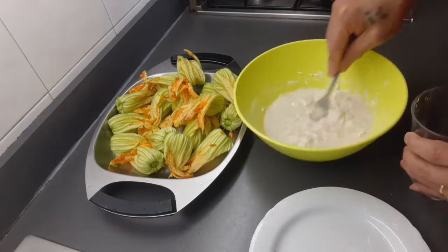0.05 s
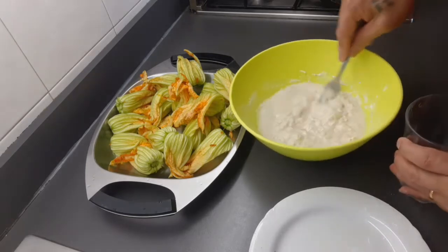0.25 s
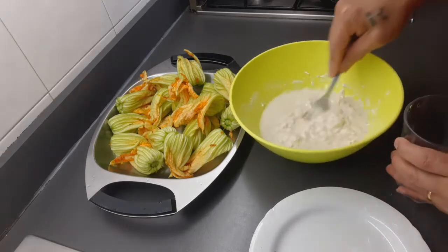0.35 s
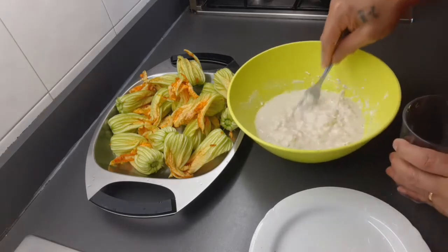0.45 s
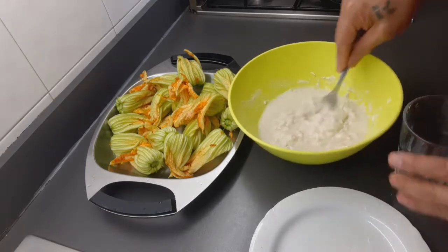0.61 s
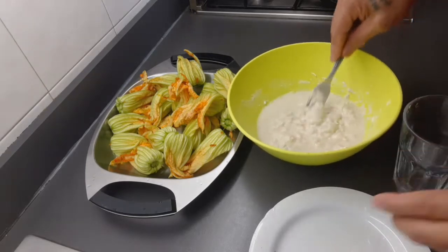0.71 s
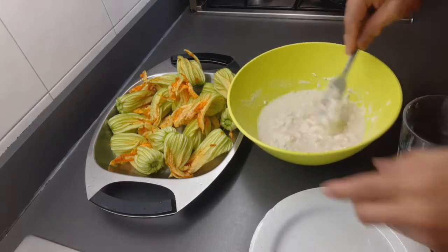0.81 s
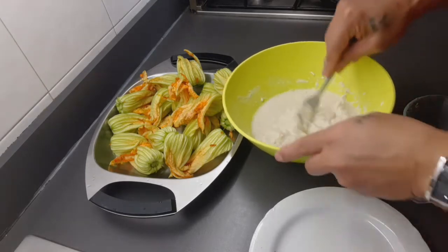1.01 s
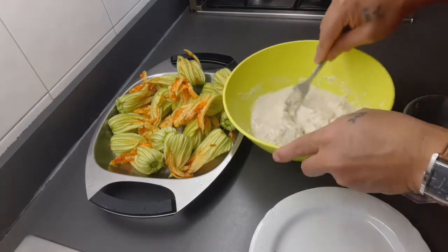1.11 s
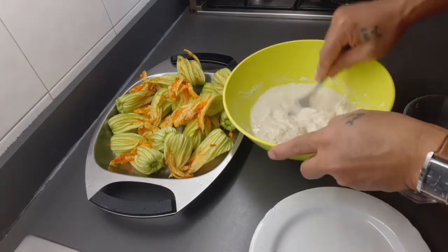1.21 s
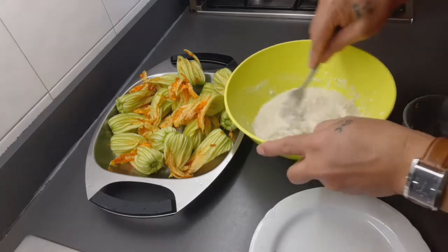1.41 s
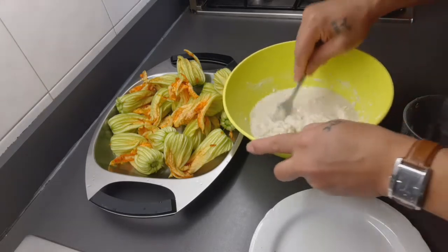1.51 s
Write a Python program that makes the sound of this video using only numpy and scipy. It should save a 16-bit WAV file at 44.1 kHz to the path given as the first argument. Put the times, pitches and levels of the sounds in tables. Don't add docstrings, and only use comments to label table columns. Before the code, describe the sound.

A glass is set down on a kitchen counter with a hard knock and brief rattle beside batter stirring

```python
import sys
import numpy as np
from scipy import signal
from scipy.fft import rfft, irfft
from scipy.io import wavfile
from scipy.ndimage import uniform_filter1d

SR = 44100
rng = np.random.default_rng(int(sys.argv[2]) if len(sys.argv) > 2 else 0)


def transcribe(signal):
    frames = np.atleast_2d(signal).T
    limited = np.clip(frames, -1, 1)
    pcm = np.round(limited * 32767).astype(np.int16)
    wavfile.write(sys.argv[1], SR, pcm)


def voltage_ratio(level):
    return 10 ** (np.asarray(level, float) / 20)


N = 68355

# t/s, level/dB
STIR_EFFORT = [(0, -59.5), (.12, -55), (.23, -61), (.4, -56), (.47, -57), (.53, -72), (.62, -58.5),
               (.71, -63.5), (.75, -73.5), (.96, -96.5), (1.005, -56), (1.09, -56), (1.17, -69.5),
               (1.26, -57), (1.31, -57), (1.36, -65), (1.49, -64), (1.55, -61.5)]


def curve(table):
    return np.interp(np.arange(N) / SR, *np.array(table).T)


def read(table, hz):
    table = np.array(table, float)
    return np.interp(np.log(np.maximum(hz, 1)), np.log(table[:, 0]), table[:, 1])


def colour(x, db=0, lead=0):
    return irfft(rfft(x) * voltage_ratio(db) * np.exp(1j * lead), N)


def unit(x):
    return x / np.sqrt(np.mean(x ** 2))


def walk(rate):
    hold = int(SR / rate)
    steps = np.repeat(rng.standard_normal(N // hold + 1), hold)
    return 0.79 * uniform_filter1d(uniform_filter1d(steps, hold), hold)[:N]


def ring(x, modes):
    total = 0
    for k, (hz, db, t60) in enumerate(modes):
        pole = np.exp((2j * np.pi * hz - np.log(1000) / max(t60, .003)) / SR)
        total = total + (-1) ** k * voltage_ratio(db) * signal.lfilter([1], [1, -pole], x).imag
    return total


def push(s, ms):
    progress = np.clip((np.arange(N) / SR - s) * 1000 / max(ms, .1), 0, 1)
    force = np.sin(np.pi * progress) ** 2
    return force / force.sum()


def burst(s, t60, hz):
    late = np.arange(N) / SR - s
    lowpass = signal.butter(6, min(hz, 19000), fs=SR, output="sos")
    hiss = signal.sosfilt(lowpass, rng.standard_normal(N))
    hiss = signal.lfilter(*signal.butter(1, [1500, 4000], "band", fs=SR), hiss) + 0.11 * hiss
    return hiss * (late > 0) * voltage_ratio(-60 * np.abs(late) / t60)


def glass():
    # t/s, peak level/dB, contact/ms
    contacts = [(.2398, -14, 0.37), (.2435, -16.5, 0.35), (.2462, -22, 0.74), (.2500, -30, 0.66),
                (.266, -36.5, 1.4), (.292, -25.5, 1.73), (.339, -71, 2.5), (.382, -36, 1.57),
                (.397, -32.5, 1.52), (.428, -42, 3), (.455, -45, 1.34)]
    # f/Hz, level/dB, t60/s
    counter_modes = [(134.6, -2, 0.15), (200, -0.5, 0.19), (255, 6.5, 0.067), (301, 1.5, .13),
                     (341.5, -4.5, .15), (400, 0, 0.11), (505.7, 1, 0.26), (586.7, 3.5, 0.097),
                     (754.6, 5, 0.076), (823, 1.5, 0.08), (1030, 9.5, 0.041), (1122, 8.5, 0.045),
                     (1600, -1.5, 0.053), (2100, -2, .04)]
    # t/s, level/dB
    chatter_level = [
        (.239, -77.5),
        (.243, -26.5),
        (.31, -38.5),
        (.33, -49.5),
        (.37, -46),
        (.397, -53),
        (.43, -64),
        (.48, -59),
        (.52, -77),
    ]
    chatter_hz = 450
    crack_db, crack_t60_s, crack_hz = -23.5, 0.078, 7220

    force = sum(voltage_ratio(db) * (-1) ** k * push(s, ms) for k, (s, db, ms) in enumerate(contacts))
    knock = 0.34 * ring(force, counter_modes)
    uneven = rng.standard_normal(N) * voltage_ratio(3.65 * rng.exponential(1, N))
    shake = signal.lfilter(*signal.butter(1, chatter_hz, fs=SR), uneven)
    chatter = unit(ring(shake, counter_modes)) * voltage_ratio(curve(chatter_level))
    landing_s = contacts[0][0]
    crack = np.array([burst(landing_s, crack_t60_s, crack_hz) for _ in range(2)])
    return knock + chatter, voltage_ratio(crack_db) * crack


def taps():
    # t/s, peak level/dB, wall pitch f/Hz, t60/s
    tick_events = [(0.406, -48, 5250, 0.028), (0.444, -66, 3180, 0.032), (0.46, -47, 3100, 0.016),
                   (0.556, -60.5, 1300, 0.045), (.572, -70, 5600, 0.032), (1.0609, -54.5, 807, 0.071),
                   (1.2152, -47, 3140, 0.017), (1.265, -49, 1140, 0.013), (1.2717, -37, 1367, 0.027),
                   (1.28, -45, 3200, 0.028), (1.266, -56, 5240, .02), (.405, -58, 3770, 0.022),
                   (1.292, -57, 1600, 0.062), (1.303, -48.5, 1630, 0.022), (1.3885, -38, 1350, 0.0085),
                   (1.5065, -50, 820, 0.043), (1.506, -57, 1940, 0.026)]
    # ratio to its pitch, level/dB
    wall_partials = [(1, 6), (.76, -3), (1.35, -4)]
    # t/s, peak level/dB, pitch
    # f/Hz, t60/s
    thud_events = [(.092, -47, 238, 0.092), (0.636, -53, 245, 0.041), (0.674, -44.5, 253, 0.052),
                   (0.242, -26.5, 100, 0.19), (0.388, -45, 100, 0.35), (0.386, -26, 200, 0.069),
                   (.40, -28, 400, 0.048), (0.418, -37, 244, 0.17), (1.061, -35, 255, 0.048),
                   (1.283, -40, 251, 0.053), (1.2154, -37.5, 395.5, 0.068), (1.225, -37.5, 250, 0.058),
                   (1.272, -43.5, 284, 0.073), (1.392, -60, 295, 0.02), (1.51, -35, 251, 0.04),
                   (1.535, -45.5, 200, 0.079)]

    total = 0
    for s, db, hz, t60 in tick_events:
        modes = [(hz * ratio, level, t60) for ratio, level in wall_partials]
        total = total + voltage_ratio(db) * ring(push(s, 0.16), modes)
    for s, db, hz, t60 in thud_events:
        total = total + voltage_ratio(db) * ring(push(s, .9), [(hz, 0, t60), (1.5 * hz, -9, t60)])
    return total


def slaps():
    # t/s, level/dB, top f/Hz, t60/s
    slap_events = [
        (.08, -62, 12340, 0.037),
        (1.0605, -28.5, 16700, 0.038),
        (1.069, -36, 15600, .03),
        (1.2145, -36.5, 6960, 0.021),
        (1.271, -41, 6900, 0.084),
        (1.288, -45, 13000, 0.081),
        (1.3895, -42, 7000, 0.094),
        (1.5065, -36, 8900, 0.07),
    ]
    return np.array([sum(voltage_ratio(db - 1) * burst(s, t60, hz) for s, db, hz, t60 in slap_events) for _ in range(2)])


def scrape():
    # f/Hz, level/dB
    scrape_spectrum = [(200, -11.5), (400, 3), (1250, -2), (2500, -6), (7300, -12.5), (8600, -22.5),
                       (11000, -15.5), (16000, -23.5)]
    grains_per_s, grain_spread_db, grain_db = 3000, 4.5, -8

    loss = read(scrape_spectrum, np.fft.rfftfreq(N, 1 / SR))
    hits = rng.random(N) < grains_per_s / SR
    grains = hits * voltage_ratio(grain_spread_db * rng.exponential(1, N)) * rng.standard_normal(N)
    gain = voltage_ratio(curve(STIR_EFFORT) + 5.5 + 2.2 * walk(47))
    direct = colour(voltage_ratio(grain_db) * unit(grains) + 0.23 * rng.standard_normal(N), loss)
    spread = colour(1.18 * rng.standard_normal((2, N)), loss)
    return direct / np.std(spread) * gain * 0.4, unit(spread) * gain * 0.81


def shaken(hz, width):
    return unit(ring(rng.standard_normal(N), [(hz, 0, 1.9 / width)]))


def rub():
    # t/s, level/dB
    rub_level = [(0, -56), (.24, -84), (.30, -24), (.33, -51), (.38, -38), (.49, -62), (.61, -70),
                 (.65, -43.5), (.70, -54.5), (.85, -48), (.875, -65.5), (.95, -49), (1.05, -77),
                 (1.075, -38.5), (1.105, -41), (1.125, -53.5), (1.3, -61), (1.55, -71)]
    # f/Hz, width/Hz, level over -65 dB at an effort of -67 dB/dB
    bowl_modes = [(255, 22, 3.5), (400, 400, 2), (100, 56, 4.5)]
    rub_hz, wander, rough_db = 140, .03, -12

    phase = 2 * np.pi * np.cumsum(rub_hz * (1 + wander * walk(21))) / SR
    stick_slip = 1.345 * np.sin(phase) + voltage_ratio(rough_db) * shaken(rub_hz, 35)
    total = stick_slip * voltage_ratio(curve(rub_level))
    for hz, width, db in bowl_modes:
        level = db + 0.29 * (curve(STIR_EFFORT) + 67) - 65
        total = total + voltage_ratio(level) * shaken(hz, width)
    return total


def room(x):
    t60_s, dull_hz, bass_hz = .26, 2500, 380
    t = np.arange(SR // 2) / SR
    noise = rng.standard_normal((2, len(t)))
    tail = signal.lfilter(*signal.butter(2, bass_hz, "high", fs=SR), noise) * (t > .004)
    low = signal.lfilter(*signal.butter(1, dull_hz, fs=SR), tail)
    tail = low * voltage_ratio(-60 * t / t60_s) + (tail - low) * voltage_ratio(-60 * t / (0.3 * t60_s))
    return signal.fftconvolve(x[None], tail / np.sqrt(np.sum(tail[0] ** 2)), axes=1)[:, :N]


def kitchen():
    # f/Hz, level/dB
    tone_spectrum = [(25, -22), (60, -12), (141, -4), (300, 4), (1000, -22), (3000, -24.5), (4400, -14),
                     (16000, -53.5)]
    # f/Hz, rms level/dB
    whine_lines = [(4145, -65.5), (4194, -71), (4538, -83.5), (5577, -77.5)]
    tone_db = -60

    hz, t = np.fft.rfftfreq(N, 1 / SR), np.arange(N) / SR
    mid, side = colour(rng.standard_normal((2, N)), read(tone_spectrum, hz))
    side = colour(side, 20 * np.log10(np.clip(hz / 600, .1, 1)))
    tone = mid + side * np.array([[1], [-1]])
    whine = 0
    for f, db in whine_lines:
        level = voltage_ratio(db + 1.5 + 3.1 * walk(24.24))
        port_phase = np.array([[0], [1.2]])
        whine = whine + level * np.sin(2 * np.pi * f * t + 2.3 * walk(30) + port_phase)
    return unit(tone) * voltage_ratio(tone_db) + whine


def lag(x, ms):
    hz = np.fft.rfftfreq(N, 1 / SR)
    return colour(x, 0, np.array([[.5], [-.5]]) * 2 * np.pi * hz * ms / 1000)


def scene():
    # f/Hz, level/dB
    port_balance = [(25, -1), (125, -2.4), (500, -1.5), (1200, 1), (2400, -2), (5000, -2.2), (9000, 2),
                    (15000, 1)]
    bowl_lag_ms, glass_lag_ms = 0.14, -.2
    room_db, fork_room_db = -8, -6

    knock, crack = glass()
    fork = taps()
    direct, spread = scrape()
    near = lag(fork + rub() + direct, bowl_lag_ms) + lag(knock, glass_lag_ms) + crack + slaps()
    echo = voltage_ratio(room_db) * room(knock + crack[0] + voltage_ratio(fork_room_db) * fork)
    far = echo + spread + kitchen()
    hz = np.fft.rfftfreq(N, 1 / SR)
    return colour(near + far, np.array([[.5], [-.5]]) * read(port_balance, hz))


def band_limit(x):
    return signal.sosfilt(signal.butter(12, 16430, fs=SR, output="sos"), x)


def record(dry):
    hiss_db, top_hz, bass_hz = -75.5, 15900, 75
    hiss = signal.lfilter([1, -.8], [1], rng.standard_normal(dry.shape))
    mix = dry + voltage_ratio(hiss_db) * hiss
    mix = signal.sosfilt(signal.ellip(6, .3, 40, top_hz, fs=SR, output="sos"), mix)
    mix = signal.lfilter(*signal.butter(2, bass_hz, "high", fs=SR), mix)
    return band_limit(mix)


dry = scene()
out = record(dry)
transcribe(out)
```